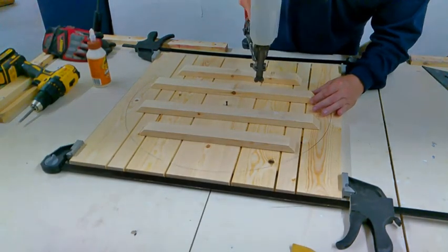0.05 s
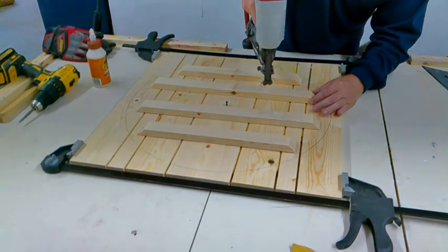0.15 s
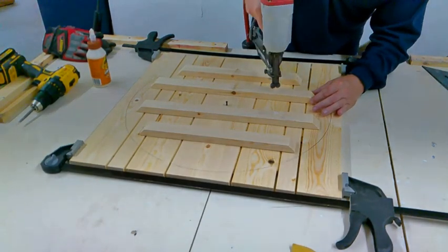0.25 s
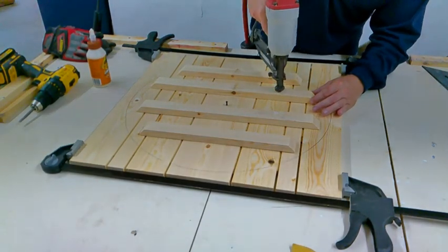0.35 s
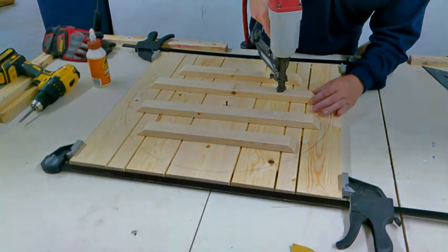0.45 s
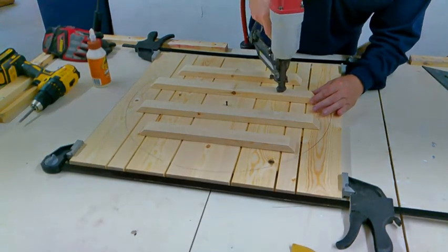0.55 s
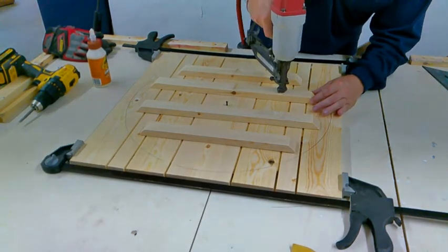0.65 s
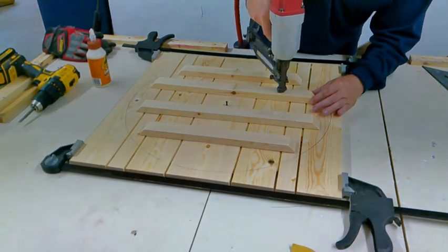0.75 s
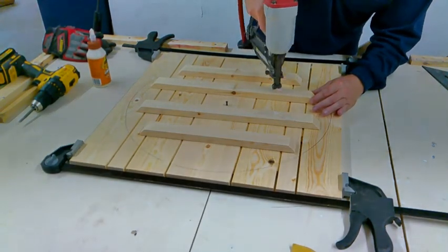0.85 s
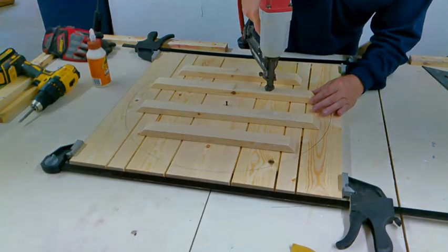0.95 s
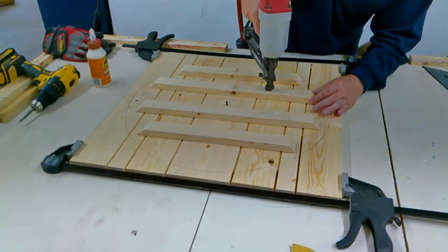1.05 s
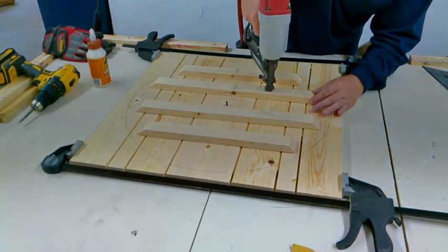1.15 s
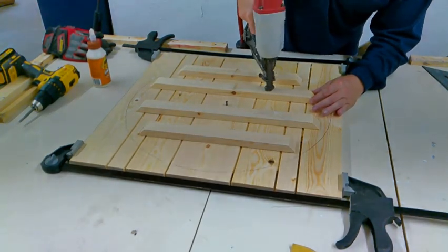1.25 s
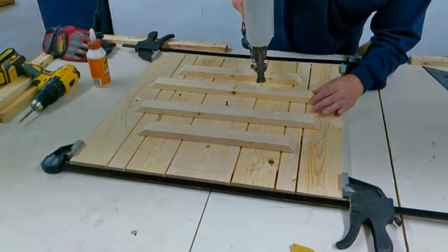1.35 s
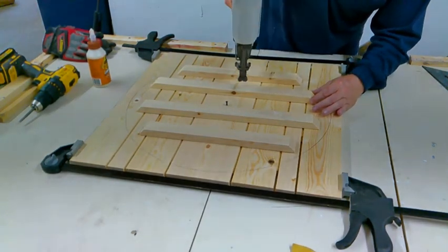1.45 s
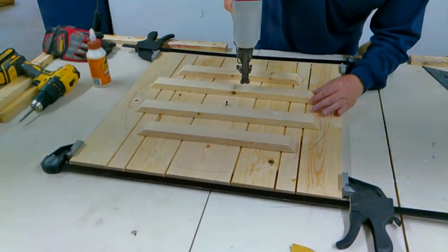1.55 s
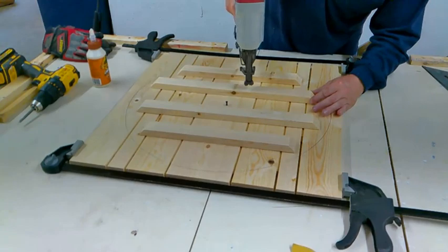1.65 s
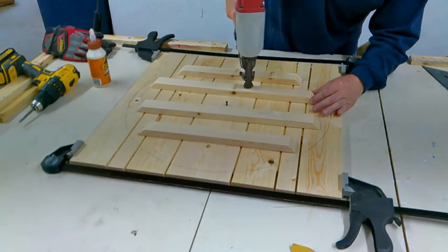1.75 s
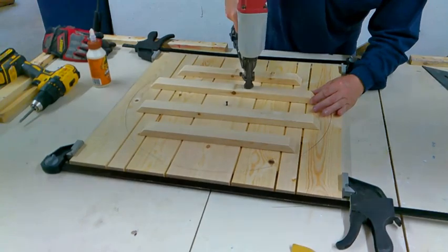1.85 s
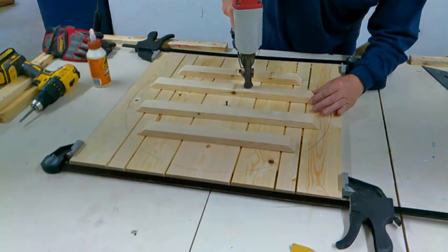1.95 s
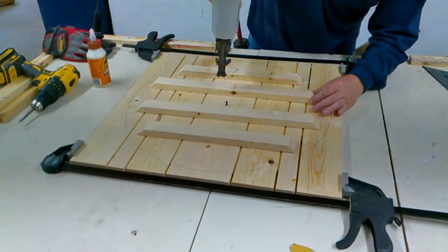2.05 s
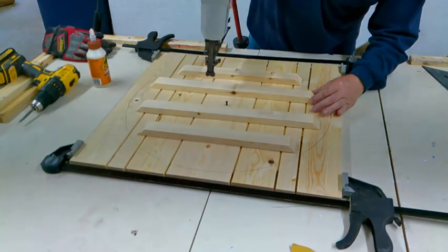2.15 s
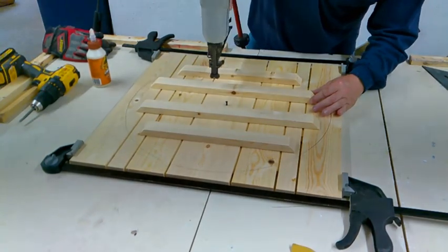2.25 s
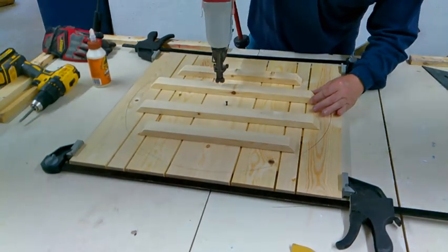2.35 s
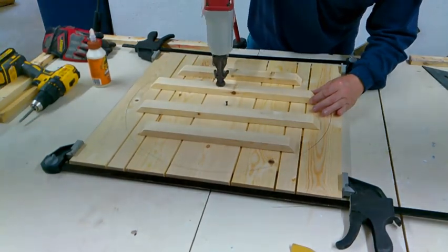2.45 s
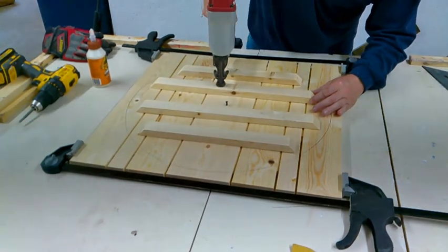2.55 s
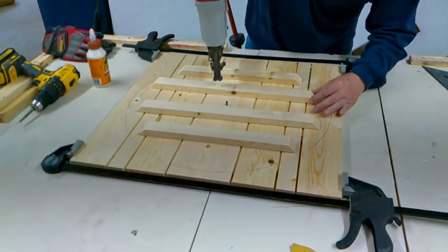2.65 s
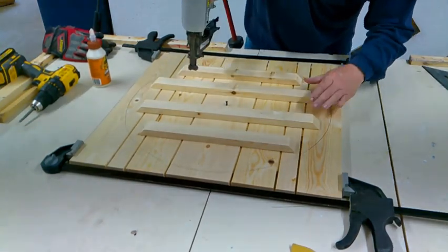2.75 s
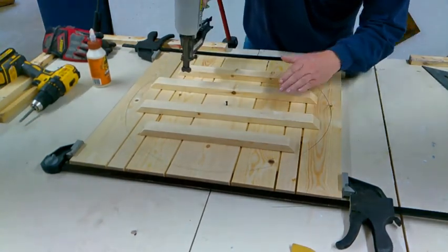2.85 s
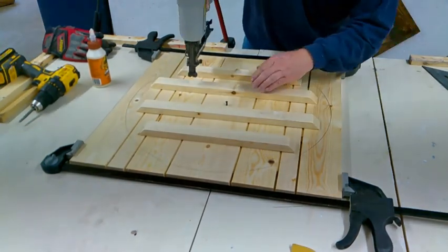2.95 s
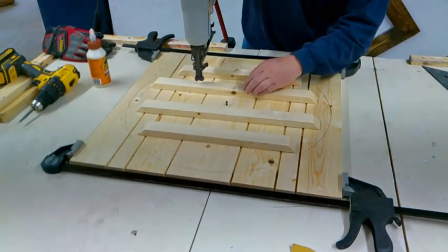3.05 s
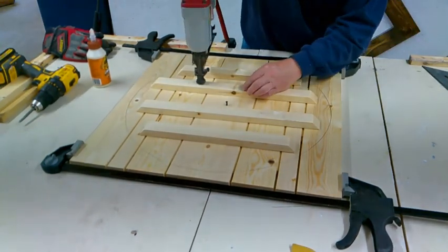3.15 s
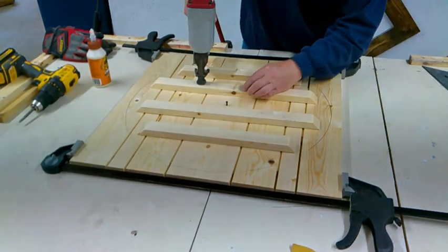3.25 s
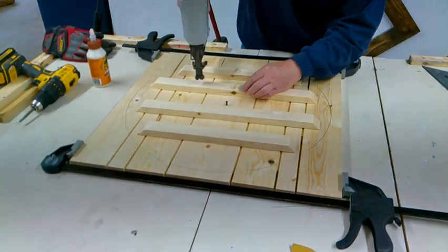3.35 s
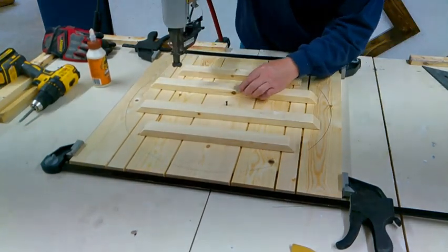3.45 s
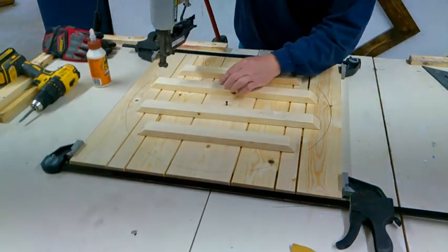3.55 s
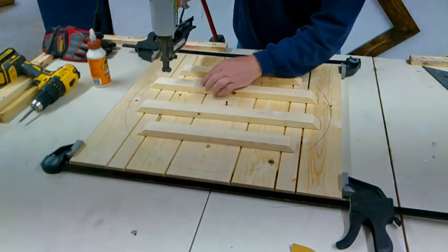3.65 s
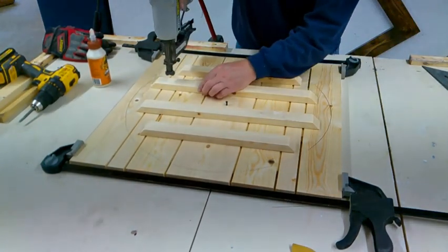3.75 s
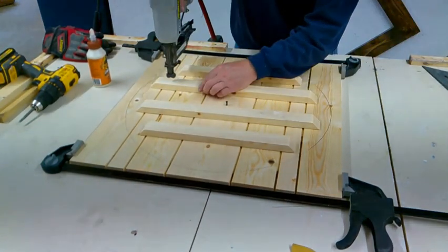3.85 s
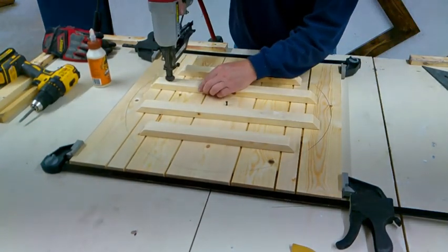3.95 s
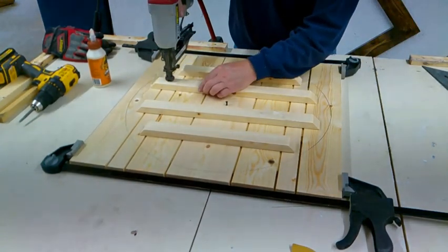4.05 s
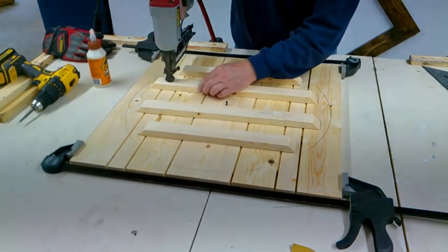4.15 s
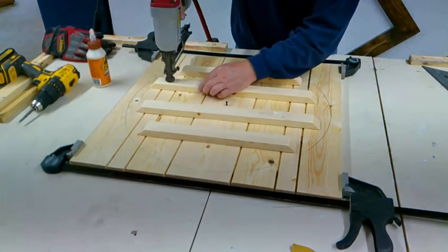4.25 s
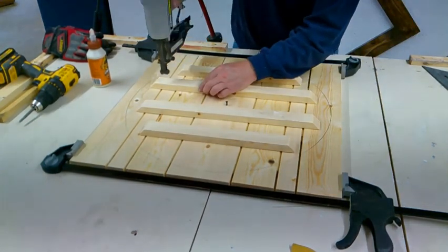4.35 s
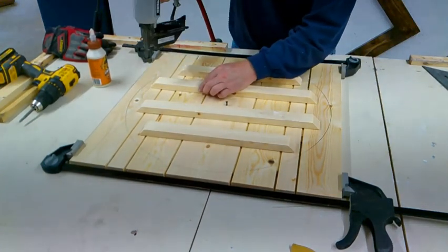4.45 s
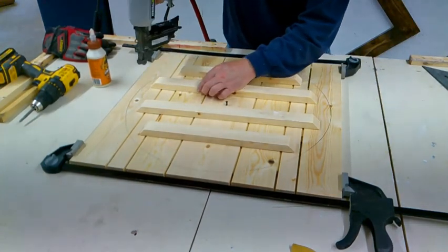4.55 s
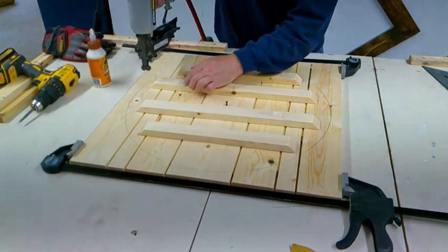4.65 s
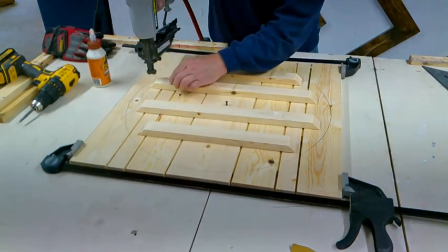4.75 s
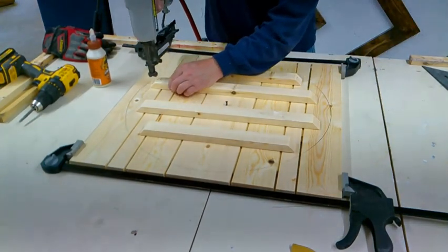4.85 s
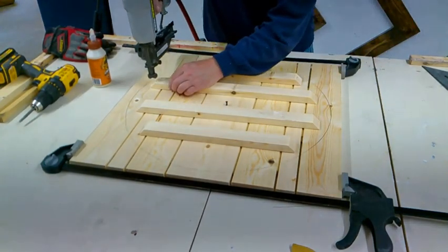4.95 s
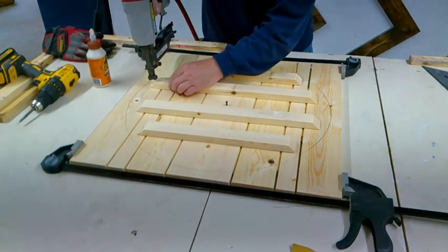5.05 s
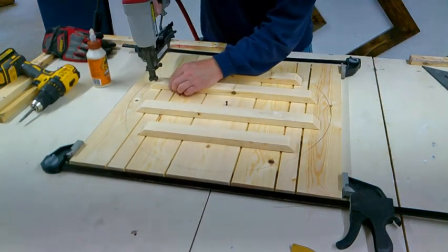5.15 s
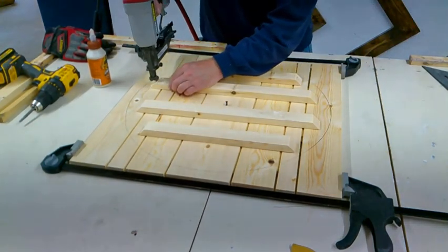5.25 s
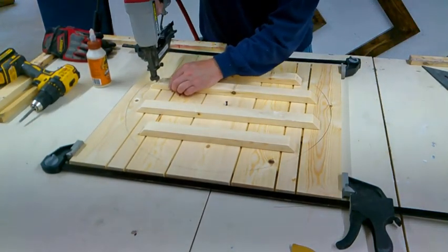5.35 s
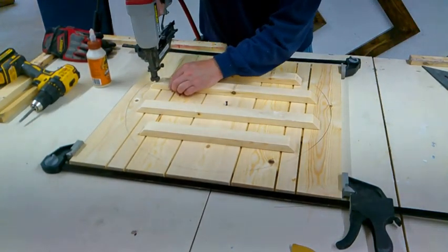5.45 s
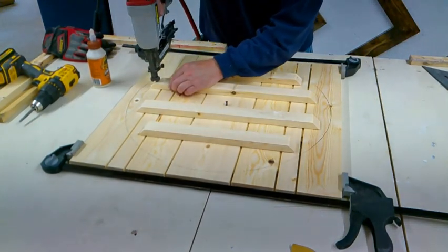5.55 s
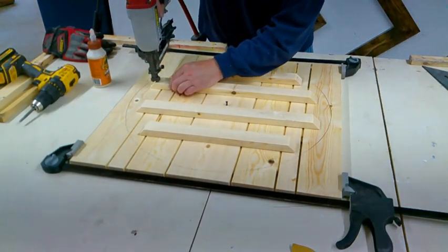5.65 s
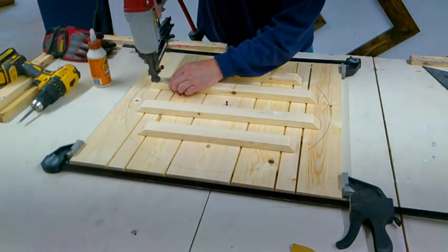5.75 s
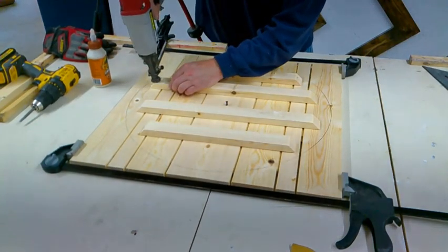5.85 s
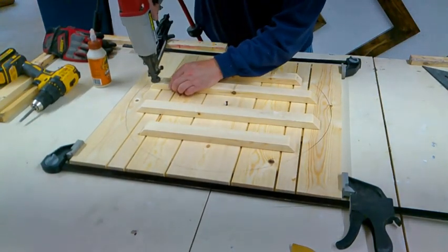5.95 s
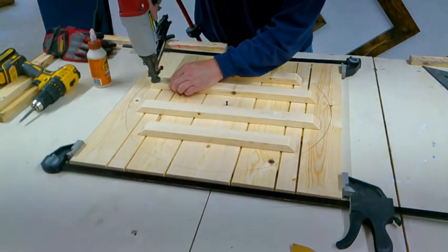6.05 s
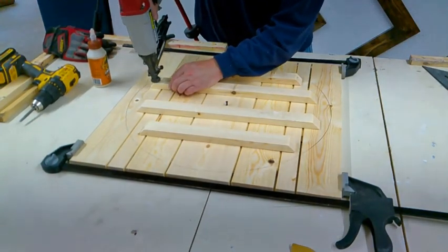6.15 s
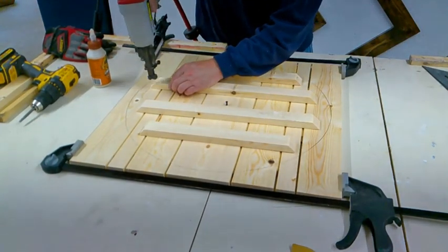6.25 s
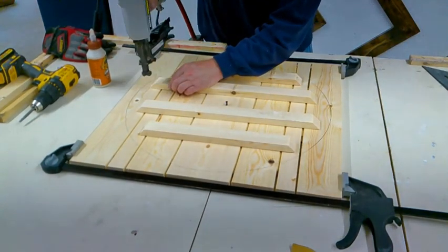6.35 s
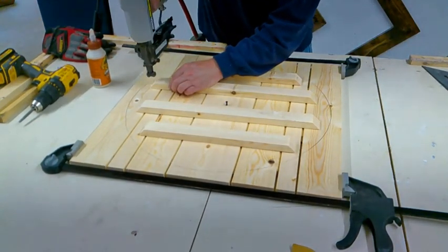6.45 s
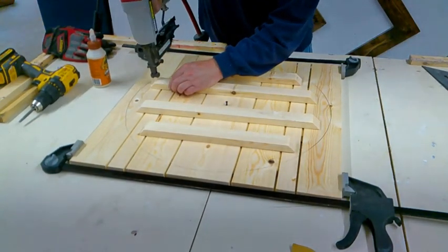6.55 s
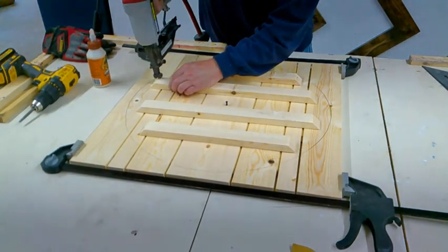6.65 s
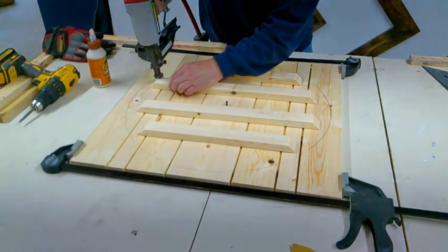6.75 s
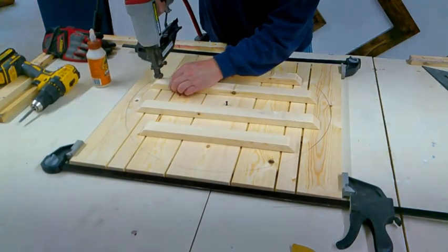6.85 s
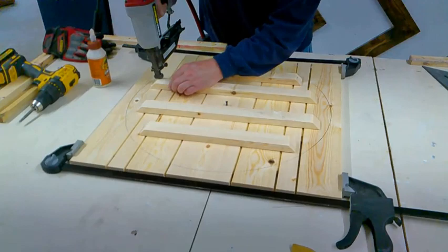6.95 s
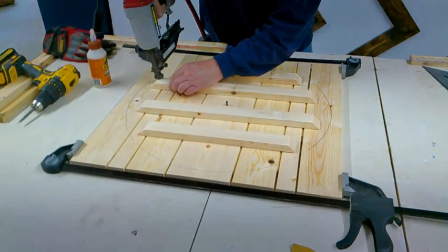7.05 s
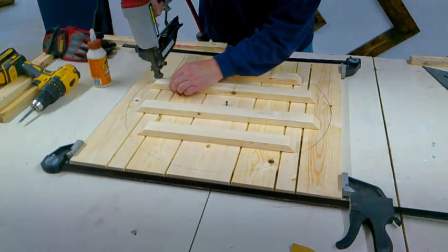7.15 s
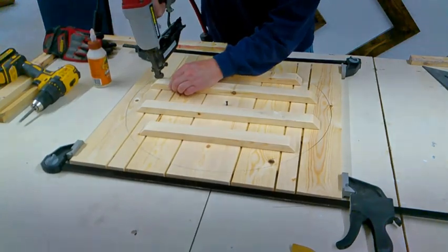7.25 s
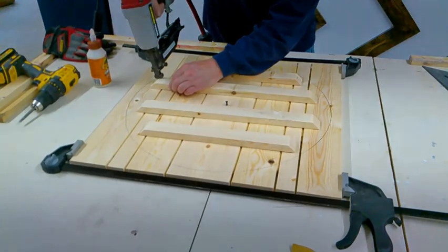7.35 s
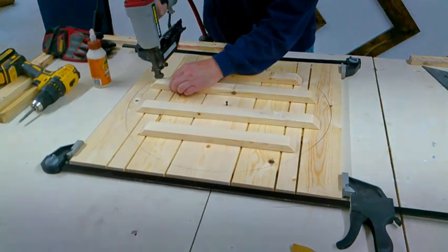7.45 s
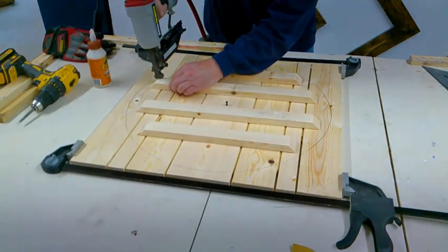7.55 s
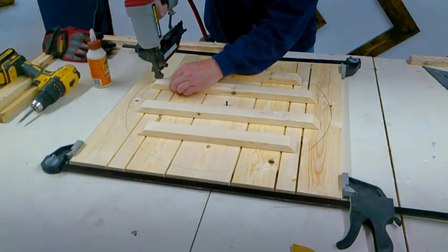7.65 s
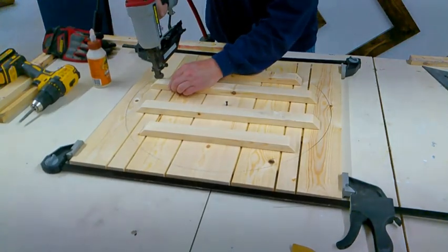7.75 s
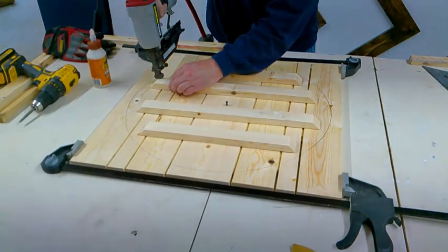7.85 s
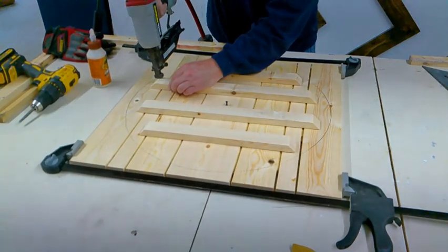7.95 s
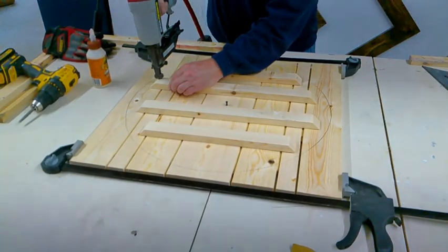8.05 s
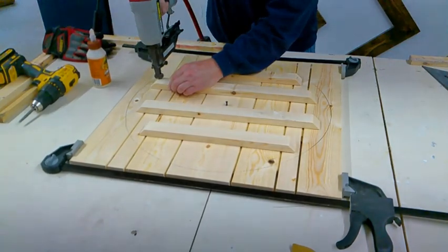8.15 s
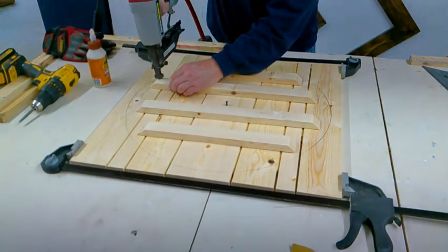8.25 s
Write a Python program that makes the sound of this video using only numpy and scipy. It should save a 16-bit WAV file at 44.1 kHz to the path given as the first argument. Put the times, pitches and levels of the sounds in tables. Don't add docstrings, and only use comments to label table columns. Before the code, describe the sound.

Overloaded pneumatic nail shots, bang then hissing exhaust and slam, punch through a small reverberant workshop. The first six run through the opening four seconds, each prepared by clicks of metal on wood. After a pause with trigger and latch ticks comes one final shot near six seconds. Its fluttering metallic ring fades, leaving small sharp clicks, brief rattles and soft bench thumps above quiet hum and shop air.

```python
import sys
import numpy as np
from scipy import signal
from scipy.fft import rfft, irfft
from scipy.io import wavfile
from scipy.ndimage import uniform_filter1d

SR = 44100
rng = np.random.default_rng(int(sys.argv[2]) if len(sys.argv) > 2 else 0)


def to_wav(sig):
    pcm = np.clip(np.atleast_2d(sig), -1, 1) * 32767
    pcm = np.round(pcm).astype(np.int16)
    wavfile.write(sys.argv[1], SR, pcm.T)


def gain_from_decibels(decibels):
    exponent = np.asarray(decibels, float) / 20
    return 10 ** exponent


N = 365588
LEAD = SR

# driver blow in seconds, lead of the valve in ms, delay of the exhaust in ms.
SHOTS = [
    (-.42, 8, 120),
    (.633, 8, 120),
    (1.168, 6.5, 110),
    (1.807, 7, 113),
    (2.486, 5.5, 134),
    (3.214, 11, 122),
    (4.186, 8, 120),
    (6.075, 8, 124),
]
# level in dB, shot by shot.
RETURN_DB = [3, -1.5, -1.65, -1.5, -1.3, -0.9, -1.5, -1.45]
# frequency in Hz, level in dB.
INTAKE = [(300, -17.5), (1000, 0), (2500, -5.5), (4500, -12.5), (7000, 2), (10500, -2.5), (12500, -6.5),
          (16000, -4)]
# frequency in Hz, level in dB.
JET = [(300, -38.5), (1000, -27.5), (2500, -8), (4500, -6), (7000, -2.5), (10500, 1.5), (13000, 0),
       (16000, -2.5)]
# frequency in Hz, width in Hz, level in dB.
BATTEN = [(230, 430, -4), (680, 830, 1), (1150, 670, 5), (1540, 150, -10), (1630, 230, -9.5),
          (2240, 2500, -7), (4200, 1100, -8)]
# frequency in Hz, width in Hz, level in dB.
BOARD = [(160, 80, -26), (326.4, 83, -6.5), (660, 170, -23), (833, 150, 1.5), (1126, 240, 5.5),
         (1390, 47, -4.5), (1666, 96, -1), (1985, 260, -3.5), (4200, 2000, -7.5)]
# frequency in Hz, width in Hz, level in dB.
MAGAZINE = [(2020, 130, -2.5), (2253, 210, 1), (3130, 95, 1.5), (3390, 110, 2), (4300, 170, -0.5),
            (5180, 170, -2.5)]
# start in seconds, crack level in dB, wood knock
# in Hz, knock level in dB, brightest metal in Hz.
CLICKS = [(0.4, -12.5, 537, -25, 1810), (0.547, -31.5, 410.6, -42, 3020),
          (0.599, -15.5, 1200, -20.5, 3380), (1.132, -21.5, 483, -25, 3284), (1.730, -1, 2000, -8, 2020),
          (1.736, -3, 597, -9, 7770), (2.4155, -7, 1200, -12.5, 6875), (3.139, -6, 1150, -9.5, 6730),
          (3.148, -7.5, 1700, -18, 8450), (3.988, -15.5, 910, -18.5, 6450), (4.019, -14, 752, -27.5, 7400),
          (4.066, -36.5, 1111, -38.5, 3610), (4.135, -17.5, 1290, -25.5, 9500),
          (4.748, -53, 2160, -37, 3060), (4.862, -38.5, 1910, -46, 8940),
          (5.141, -16.5, 1158, -31.5, 7570), (5.426, -52, 396, -38.5, 3390),
           (5.467, -37.5, 408, -42.5, 3660), (5.619, -29.5, 413, -39.5, 3685),
           (5.874, -15, 1616, -51, 7030), (6.015, -27, 305, -59.5, 10550), (6.044, -39.5, 2020, -54, 10500),
           (6.881, -23, 412, -42, 5730), (6.964, -22, 1865, -40.5, 8500), (7.004, -20, 420, -36.5, 4210),
           (7.143, -43.5, 900, -54.5, 3000), (7.152, -33, 910, -46.5, 3650), (7.164, -41, 1500, -56, 8950),
           (7.191, 15, 2090, -17.5, 7620), (7.486, -39, 721, -48, 7840), (7.537, -40.5, 391, -70, 3390),
           (7.584, -25.5, 294, -62, 8020), (7.789, -6, 2720, -28.5, 4200), (7.957, -12, 1870, -28, 10500),
           (8.061, 2.5, 2240, -13, 8640)]
# frequency in Hz, level in dB, T60 in seconds.
PARTS = [(2020, 0.5, .012), (2780, -3, .01), (3500, -6.5, .012), (4200, 4, .009), (5130, -5, .007),
         (6040, -2.5, 0.0048), (7100, -3.5, .006), (8470, 2.5, 0.0086), (10500, -1, 0.0067)]
# start in seconds, frequency in Hz, level in dB.
SPRING = [(.401, 3510, -39), (4.746, 3060, -53), (5.14, 3440, -42), (5.467, 3660, -51),
          (5.618, 3640, -58.5)]
# start in seconds, level in dB, frequency in Hz.
THUMPS = [(0.394, -37.5, 384), (1, -26.5, 389), (1.73, -15.5, 335), (2.414, -16, 301.6),
          (3.14, -26.5, 136.7), (3.989, -27.5, 423.5), (5.142, -35.5, 425), (5.426, -34.5, 308),
          (5.617, -43, 245), (6.019, -42.5, 189), (6.852, -41, 204), (7.004, -35.5, 107),
          (7.193, -29.5, 298.6), (7.262, -30, 126), (7.532, -40, 108), (7.788, -45, 165), (8.063, -41, 151)]
# frequency in Hz, T60 in seconds.
ROOM = [(120, 0.4), (300, 0.39), (800, 0.42), (2000, 0.4), (5000, 0.4), (10000, 0.33), (15000, .22)]
# frequency in Hz, rms level in dB.
MAINS = [(59.9, -48.5), (119.8, -72), (179.7, -60), (299.5, -66), (419.3, -68.5)]
# frequency in Hz, level in dB per Hz.
AIR = [(53, -22.5), (95, -11), (187, -7.5), (300, -10.5), (360, -12), (1010, -11.5), (2600, -23),
       (15500, -32.5)]
# start in seconds, end in seconds,
# side level against mid in dB.
UNLIKE = [(0.589, 0.641, -24), (1.96, 1.98, -12), (2.713, 2.753, -4), (3.421, 3.452, -17.5),
          (4.369, 4.406, -18.5), (5.09, 8.3, -12.5)]


def coloured(shape, size):
    hz, db = np.transpose(shape)
    log_hz = np.log(np.fft.rfftfreq(size, 1 / SR) + 1)
    gain = gain_from_decibels(np.interp(log_hz, np.log(hz), db))
    x = irfft(rfft(rng.standard_normal(size)) * gain, size)
    return x / x.std()


def fade(t60, size):
    return gain_from_decibels(-60 * np.arange(size) / SR / t60)


def ring(hz, t60, size):
    return np.sin(2 * np.pi * hz * np.arange(size) / SR) * fade(t60, size)


def band(x, hz, width_hz):
    return signal.lfilter(*signal.iirpeak(min(hz, .45 * SR), hz / width_hz, SR), x)


def add(out, s, x):
    i = int(s * SR) + LEAD
    out[i:i + len(x)] += x[:len(out) - i]


def contact(rise_s, t60, size=2048):
    t = np.arange(size) / SR - rise_s
    envelope_db = np.where(t < 0, 30 * t / rise_s, -60 * t / t60)
    spectrum = rfft(rng.standard_normal(size) * gain_from_decibels(envelope_db))
    even = irfft(spectrum / np.abs(spectrum) ** .9, size)
    return even * gain_from_decibels(-60 * np.clip(t - t60 / 2, 0, None) / t60)


def blow(body, contact_s):
    force = contact(.0005, contact_s)
    spot_db = 1.5 * rng.standard_normal(len(body))
    x = 0
    for (hz, width_hz, db), change_db in zip(body, spot_db):
        x = x + gain_from_decibels(db + change_db) * band(force, hz, width_hz)
    return x / np.sqrt(np.sum(x ** 2) / 100)


def puff(shape, rise_s, hold_s, t60):
    t = np.arange(SR // 2) / SR
    swell = gain_from_decibels(-45 * np.clip(1 - t / rise_s, 0, 1))
    pressure = gain_from_decibels(-60 * np.clip(t - rise_s - hold_s, 0, None) / t60)
    return coloured(shape, len(t)) * swell * pressure


def magazine():
    shake = rng.standard_normal(SR)
    ringing = 0
    for hz, width_hz, db in MAGAZINE:
        cluster = band(band(shake, hz, width_hz), hz, width_hz)
        ringing = ringing + gain_from_decibels(db) * cluster
    return gain_from_decibels(-24.5) * ringing * fade(2.1, size=SR)


def nailer():
    out, steel = np.zeros((2, N + LEAD))
    for (s, lead_ms, vent_ms), return_db in zip(SHOTS, RETURN_DB):
        valve = s - lead_ms / 1000
        vent = s + vent_ms / 1000
        home = vent + .0315
        add(out, valve, gain_from_decibels(7.5) * puff(INTAKE, rise_s=0.0094, hold_s=0.021, t60=0.22))
        add(out, s + .001, gain_from_decibels(19) * blow(BATTEN, 0.004))
        add(out, s + .016, gain_from_decibels(27) * blow(BATTEN, .015))
        add(out, vent - .002, gain_from_decibels(return_db + 15.5) * puff(JET, rise_s=.003, hold_s=0.016, t60=0.15))
        add(out, home - .001, gain_from_decibels(return_db + 21) * blow(BOARD, .012))
        add(steel, home, magazine())
    return out, steel


def ring_parts(pings, s, crack_db, tick_hz):
    grip = rng.standard_normal((len(PARTS), 3)) * [.02, 4, .001]
    for (hz, db, t60), (detune, spot_db, late_s) in zip(PARTS, grip):
        near_db = -12 * abs(np.log2(hz / tick_hz)) + spot_db
        ping = ring(hz * (1 + detune), t60, size=SR // 16)
        add(pings, s - .0008 + abs(late_s), gain_from_decibels(crack_db - 16.5 + db + near_db) * ping)


def clicks(out, pings, rise_s=.003):
    for s, crack_db, knock_hz, knock_db, tick_hz in CLICKS:
        rattle = contact(rise_s, 0.03)
        crack = band(band(rattle, 7300, 11000), .7 * tick_hz, 2.2 * tick_hz)
        knock = band(rattle, knock_hz, 0.17 * knock_hz) + .5 * band(rattle, knock_hz, 2.1 * knock_hz)
        tick = band(rattle, tick_hz, .1 * tick_hz) + 0.33 * band(rattle, tick_hz, 0.22 * tick_hz)
        for part, db in [(crack, crack_db - 18), (knock, knock_db + 5), (tick, crack_db - 23.5)]:
            add(out, s - rise_s, gain_from_decibels(db) * part / np.abs(part).max())
        ring_parts(pings, s, crack_db, tick_hz)


def spring(out):
    for s, hz, db in SPRING:
        add(out, s, gain_from_decibels(db) * ring(hz, .08, size=SR // 4))


def bench(out):
    for s, db, hz in THUMPS:
        add(out, s + 0.0016, gain_from_decibels(db - 1.5) * ring(hz, 0.058, size=SR // 4))


def handling():
    out, pings = np.zeros((2, N + LEAD))
    clicks(out, pings)
    spring(out)
    bench(out)
    return out, pings


def room(x, wet_db=-2.5, first_s=0.0016, build_s=0.0043):
    size = SR
    hz, t60 = np.transpose(ROOM)
    tail = 0
    for centre in 60 * 2 ** np.arange(0, 8.2, .5):
        part = band(band(rng.standard_normal(size), centre, centre / 2), centre, centre / 2)
        tail = tail + part * fade(np.interp(np.log(centre), np.log(hz), t60), size)
    tail = tail * np.clip((np.arange(size) / SR - first_s) / build_s, 0, 1)
    tail = tail / np.sqrt(np.sum(tail ** 2))
    return x + gain_from_decibels(wet_db) * signal.fftconvolve(x, tail)[:len(x)]


def shop():
    t = np.arange(N) / SR
    hum = sum(gain_from_decibels(db) * np.sqrt(2) * np.sin(2 * np.pi * hz * t) for hz, db in MAINS)
    drift = uniform_filter1d(rng.standard_normal(N), size=SR // 4)
    air_db = -53 + 0.76 * drift / drift.std()
    return hum + gain_from_decibels(air_db) * coloured(AIR, N)


def scene():
    shots, steel = nailer()
    touches, pings = handling()
    near = 0.32 * (np.arange(N + LEAD) > LEAD + 5.0 * SR)
    to_room = .42
    heard = room(shots + touches + to_room * pings)
    heard = heard + near * touches + (1 - to_room + near) * pings + steel
    mono = heard[LEAD:] + shop()
    return np.array([mono, mono])


def overload(x, top=0.61, knee=3.7):
    limit = top * (1 + 0.049 * np.sign(x))
    held = x / (1 + np.abs(x / limit) ** knee) ** (1 / knee)
    held = signal.lfilter(*signal.butter(3, 16500, fs=SR), held)
    return held + 0.051 * band(held, 10000, 4600)


def blur(x, size=384, blur_db=-11):
    bins = signal.stft(x, nperseg=size)[2]
    grain = rng.standard_normal(bins.shape) + 1j * rng.standard_normal(bins.shape)
    grain[:2] *= .3
    noise = signal.istft(bins * grain, nperseg=size)[1][:len(x)]
    return (x + gain_from_decibels(blur_db) * noise) / np.hypot(1, gain_from_decibels(blur_db))


def treble_side(x):
    smear = rng.standard_normal(128) / np.sqrt(128)
    side = signal.lfilter(*signal.butter(2, 8000, "high", fs=SR), np.convolve(x, smear, "same"))
    t = np.arange(N) / SR
    return side * sum(gain_from_decibels(db) * (t > start) * (t < end) for start, end, db in UNLIKE)


def band_limit(x):
    return signal.sosfilt(signal.butter(12, 15680, fs=SR, output="sos"), x)


def record(dry):
    held = blur(overload(dry[0]))
    side = treble_side(held)
    return band_limit(np.array([held + side, held - side]))


dry = scene()
out = record(dry)
to_wav(out)
```